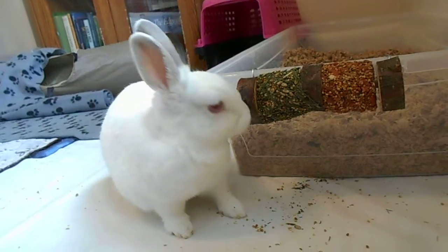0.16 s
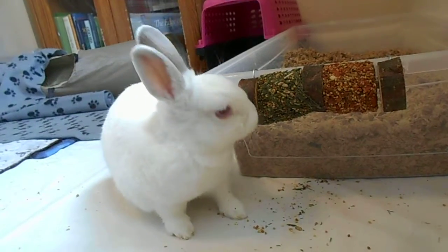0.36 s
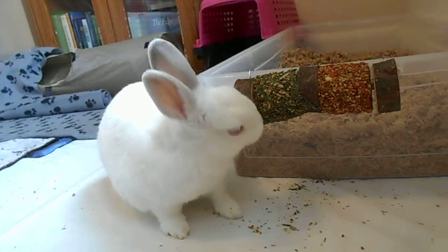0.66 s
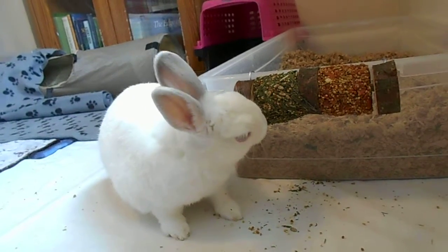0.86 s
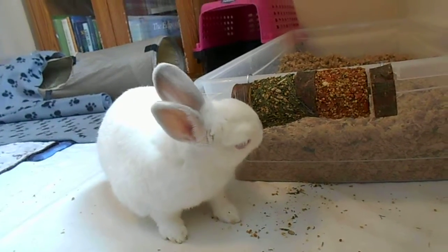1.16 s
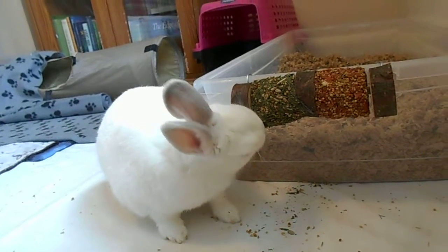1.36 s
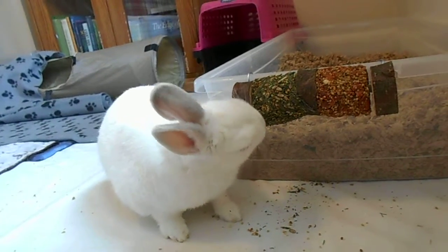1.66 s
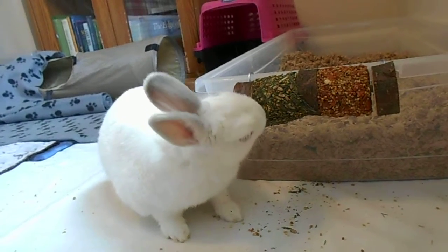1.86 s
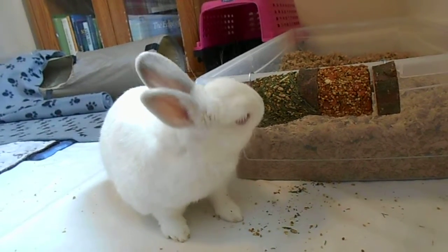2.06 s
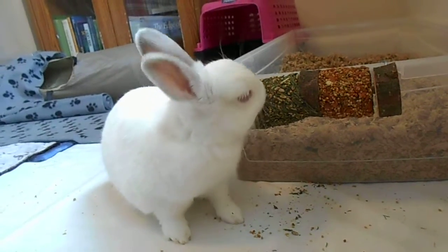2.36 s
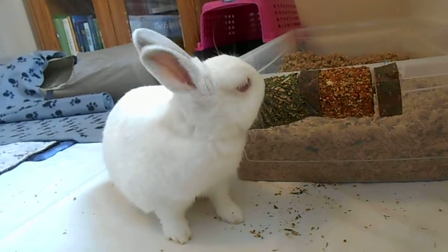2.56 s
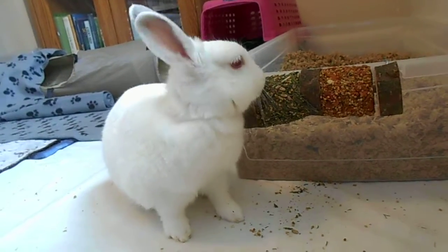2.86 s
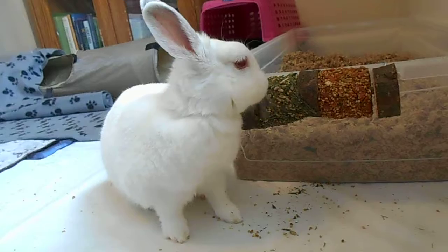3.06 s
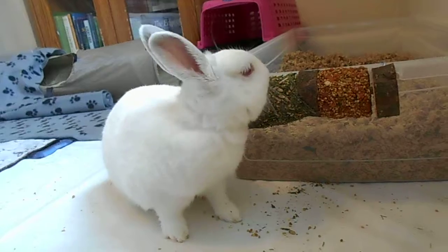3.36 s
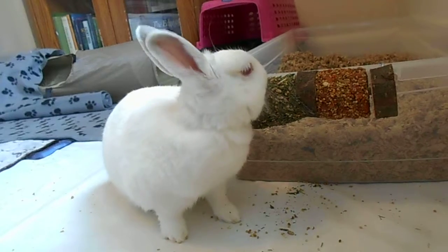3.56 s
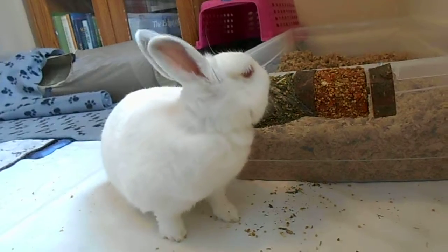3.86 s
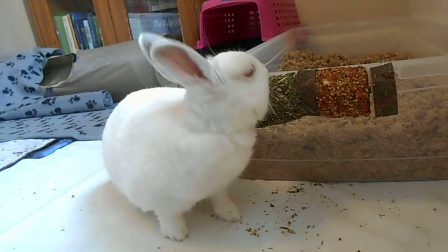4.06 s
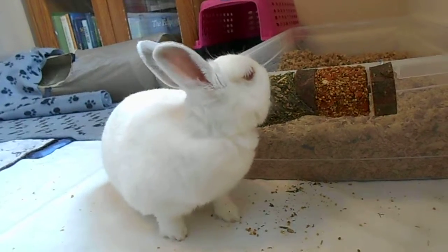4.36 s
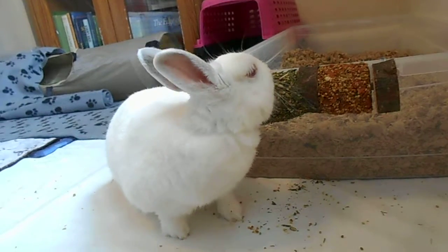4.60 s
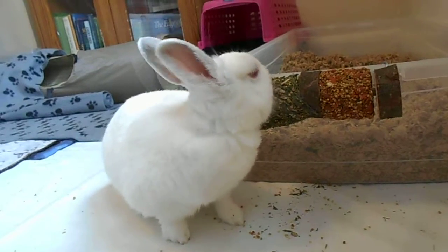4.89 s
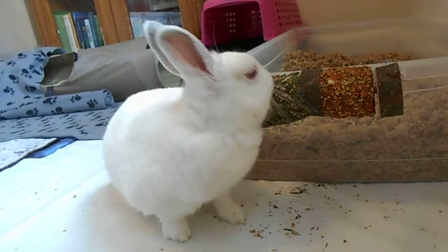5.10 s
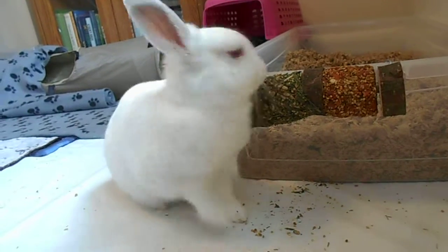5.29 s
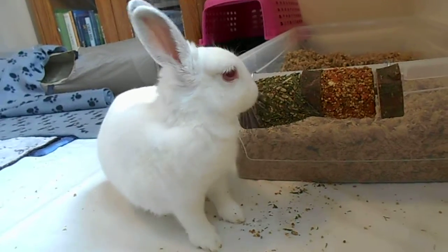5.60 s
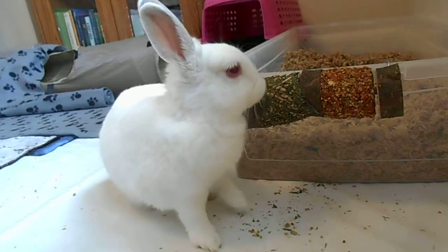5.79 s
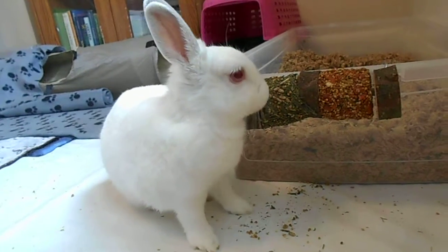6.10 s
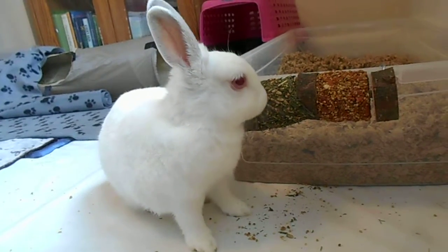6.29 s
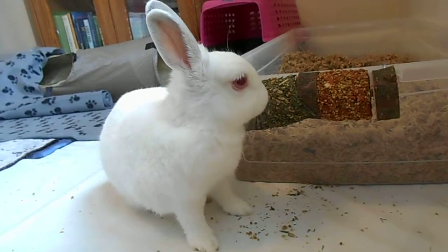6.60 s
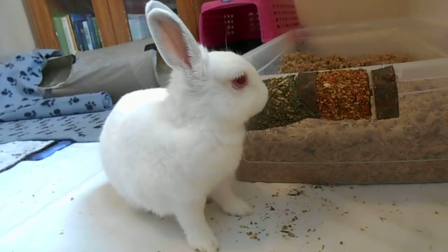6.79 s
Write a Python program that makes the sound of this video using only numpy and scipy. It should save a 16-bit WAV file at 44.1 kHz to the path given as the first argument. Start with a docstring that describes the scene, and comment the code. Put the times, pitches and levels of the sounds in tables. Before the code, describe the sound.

In a quiet room, a rabbit gnaws a hollow seed-crusted chew log in sharp, crunchy bursts, with woody knocks and low plastic-box thumps.

```python
"""First one hears room rumble and microphone hiss, and a far low hum that glides up and fades.
Then, close to a small microphone in a quiet room, a rabbit gnaws a seed-crusted wooden chew log.
In each stroke the teeth scrape, slip and crack crust and fibres: noise bursts through resonances.
Tugs knock the hollow log and the plastic box behind it: damped sines. A tap, ticks and soft thuds join in."""
import sys
import numpy as np
from scipy import signal
from scipy.fft import rfft, irfft, next_fast_len
from scipy.io import wavfile
from scipy.ndimage import uniform_filter1d, map_coordinates

SR = 44100
rng = np.random.default_rng(int(sys.argv[2]) if len(sys.argv) > 2 else 0)


def put_to_file(sound):
    """Save the sound as 16-bit audio at rate SR, in the file named by the first command-line argument."""
    columns = np.atleast_2d(sound).T  # one column per channel
    safe = np.clip(columns, -1, 1)
    whole_steps = np.round(safe * 32767)
    wavfile.write(sys.argv[1], SR, whole_steps.astype(np.int16))


def boost_factor(decibels):
    """Convert a level in decibels to a linear amplitude factor."""
    exponent = np.asarray(decibels, float) / 20
    return 10 ** exponent


N = 306173


def unit(x):
    """Scaled to rms 1."""
    return x / np.sqrt(np.mean(x ** 2) + 1e-20)


def along(points, hz):
    """Value at each frequency from (f/Hz, value) points on a log axis."""
    f, value = np.transpose(points)
    return np.interp(np.log(hz + 1), np.log(f + 1), value)


def curves(rows, outside=None):
    """One value per sample for each column after the time."""
    s, *columns = np.transpose(rows)
    t = np.arange(N) / SR
    return [np.interp(t, s, column, outside, outside) for column in columns]


def wobble(rate):
    """A smooth random curve, rate knots a second."""
    knots = rng.standard_normal(int(N * rate / SR) + 4)
    return map_coordinates(knots, [np.arange(N) * rate / SR])


def filtered(x, response):
    """x times a complex response of frequency."""
    m = next_fast_len(N + SR // 2)
    return irfft(rfft(x, m) * response(np.fft.rfftfreq(m, 1 / SR)), m)[..., :N]


def modes(table):
    """Causal response of a set of resonances, with alternating signs."""
    def response(f):
        total = 0
        for k, (centre, width, db) in enumerate(table):
            damping = 1j * f * width
            total = total + (-1) ** k * boost_factor(db) * damping / (centre * centre - f * f + damping)
        return total
    return response


def grit(spiky_db, rate):
    """Noise of rms 1 broken into lumps."""
    return unit(rng.standard_normal(N) * boost_factor(spiky_db * wobble(rate)))


def swell(u, power):
    """Rises to 1 at u = 1, then dies away."""
    return (u * np.exp(1 - u)) ** power


# spectral shape of the rumble and hiss, relative: f/Hz, level/dB per Hz
HISS_SHAPE = [(12, -38), (20, 6), (38, -7), (65, -1), (85, -7), (138, -4), (167, -9.5), (310, -12.5),
              (345, -13), (503, -16), (884, -19), (8440, -27.5), (10200, -29.5), (12300, -59), (16000, -87),
              (22000, -120)]


def hiss():
    """Room rumble and the microphone's own steady noise."""
    rms_db = -57
    noise = filtered(rng.standard_normal(N), lambda f: boost_factor(along(HISS_SHAPE, f)))
    return boost_factor(rms_db) * unit(noise)


# a far motor-like tone, before its random wavering: t/s, f/Hz, level/dB
HUM_GLIDE = [(.05, 115.8, -68), (.4, 125.7, -56), (.6, 136.7, -57.5), (.72, 139, -52.5),
             (1.14, 142.3, -53.5), (1.2, 148, -72), (1.3, 154.8, -62), (1.4, 154.4, -74)]
# a fuzzy hum near the pitch of the box wall wavers, loudest in the hardest gnawing: t/s, level/dB
BOX_DRONE = [(1.3, -61), (1.68, -71), (2.02, -61.5), (2.5, -79), (2.9, -68.5), (3.22, -84), (3.65, -62),
             (3.98, -53), (4.17, -82), (4.24, -61), (4.45, -49.5), (5.6, -71.5), (5.8, -59.5), (6.05, -78),
             (6.24, -56), (6.45, -85), (6.78, -58.5), (6.9, -75)]


def hum():
    """A wavering low sine that climbs, and the fuzzy hum of the box wall: noise in a narrow resonance."""
    hz, db = curves(HUM_GLIDE)
    on = uniform_filter1d((np.arange(N) < HUM_GLIDE[-1][0] * SR) * 1., 4000)
    level = np.sqrt(2) * on * boost_factor(db + 2.2 * wobble(14.3))
    phase = 2 * np.pi * np.cumsum(hz + 1.5 * wobble(12.9)) / SR
    fuzz = unit(filtered(rng.standard_normal(N), lambda f: modes([(143, 12, 0)])(f) ** 2))
    return level * np.sin(phase) + boost_factor(curves(BOX_DRONE, outside=-120)[0]) * fuzz


# the body shifting its weight on the floor: t/s, level/dB
FLOOR_SHUFFLE = [(2.55, -57.5), (2.7, -60), (3.7, -67), (3.85, -54), (4.9, -55), (5.3, -52), (5.55, -55)]


def shuffle():
    """Soft thuds through the floor, below the log's modes: lumpy noise in a low resonance."""
    thud = unit(filtered(grit(spiky_db=4, rate=14), lambda f: modes([(45, 60, 0)])(f) ** 2))
    return boost_factor(curves(FLOOR_SHUFFLE, outside=-120)[0]) * thud


# how fast the room's answer dies: f/Hz, t60/s
ROOM_DECAY = [(200, 0.18), (2000, 0.17), (10000, 0.1)]


def room(x):
    """The walls answer with a tail of decaying noise, each frequency dying at its own speed."""
    out, step = np.zeros(N + SR), SR // 40  # the tail is a fresh random draw every 25 ms
    delay = 150  # samples
    for start in range(0, N, step):
        hz, t, z = signal.stft(rng.standard_normal(SR // 4), SR, nperseg=256)
        decay = boost_factor(-60 * t / along(ROOM_DECAY, hz)[:, None])
        tail = signal.istft(z * decay, SR, nperseg=256)[1]
        tail *= 1 - np.exp(-np.arange(len(tail)) / SR / 0.00077)  # echoes thicken over the first ms
        wet = signal.fftconvolve(x[start:start + step], tail / np.linalg.norm(tail))
        out[start + delay:][:len(wet)] += wet[:N + SR - start - delay]
    return out[:N]


# the small microphone's response: f/Hz, level/dB
MIC_RESPONSE = [(20, -11.5), (10200, 0.5), (10900, -16.5), (11400, -16.5), (12300, -23), (12600, -67)]


def mic(x):
    """The microphone's colour: a gain at each frequency."""
    return filtered(x, lambda f: boost_factor(along(MIC_RESPONSE, f)))


# one dry tick near the microphone: t/s, level/dB, width/ms
NEAR_TAP = (.7507, -29.5, 0.22)


def tap():
    """A quick push of air and a slower, shallower rebound."""
    s, db, ms = NEAR_TAP
    u = (np.arange(N) / SR - s) / (ms / 1000)
    push = np.exp(-u ** 2 / 2)
    rebound = 0.44 * np.exp(-((u - 5.5) / 4.3) ** 2 / 2)
    return boost_factor(db) * (push - rebound)


# short pitched ticks, perhaps hard seeds snapping or crumbs landing: t/s, level/dB, f/Hz
SEED_PINGS = [(2.653, -32, 1780), (2.66, -36, 2030), (2.673, -38, 1900), (3.788, -40, 1440),
              (4.256, -26, 1490), (5.336, -35, 2340), (5.798, -44, 1640), (5.952, -33.5, 1160),
              (5.965, -37, 990), (6.181, -38.5, 1175)]


def pings():
    """One damped resonance per tick."""
    t60_s, rise_s = .03, .0012
    out, t = np.zeros(N + SR), np.arange(SR // 10) / SR
    for s, db, hz in SEED_PINGS:
        envelope = boost_factor(db - 60 * t / t60_s) * (1 - np.exp(-t / rise_s))
        out[round(s * SR):][:len(t)] += envelope * np.sin(2 * np.pi * hz * t)
    return out[:N]


# strokes of the incisors along the log, with the levels before they sag:
# t/s of the start, length/s, scrape level/dB, shake of the log level/dB, boom of the box level/dB
TOOTH_STROKES = [(2.633, 0.12, -67, -41, -36), (3.484, .11, -64, -46, -38), (3.712, .055, -74, -56.5, -48),
                 (3.775, .15, -53, -34.5, -28.5), (4.124, 0.09, -73, -56, -35),
                 (4.223, 0.083, -55, -30, -26), (4.388, .09, -57.5, -49, -28.5),
                 (4.488, 0.1, -66, -57, -46), (4.61, 0.12, -55, -31.5, -33.5), (4.75, 0.1, -54, -62, -39),
                 (5.027, 0.1, -55.5, -40, -31.5), (5.329, 0.14, -58.5, -58, -42),
                 (5.508, 0.12, -73, -54.5, -56)]
RELEASE_S = 0.048


def strokes(column, sag_db_per_s, release_s):
    """Gain of one stroke column: a quick attack, a steady sag, a release after the teeth let go."""
    attack_s = 0.0081
    table = np.array(TOOTH_STROKES)
    t = np.arange(N) / SR - table[:, :1]
    length, db = table[:, [1]], table[:, [column]]
    on = np.clip(t / attack_s, 0, 1) * np.exp(-np.maximum(t - length, 0) / release_s)
    return np.max(on * boost_factor(db - sag_db_per_s * np.maximum(t, 0)), axis=0)


def scrape():
    """How hard the teeth rub the crust."""
    return strokes(column=2, sag_db_per_s=56, release_s=RELEASE_S)


def shake():
    """How hard the log is shaken; it stops sooner than the rubbing."""
    return strokes(column=3, sag_db_per_s=42, release_s=0.0051)


MOST_SLIPS = 24  # room for the slips of one stroke


def slips(gain, over_db, scatter_db):
    """Unevenly spaced slips inside every stroke: times, levels, two chance values and lengths in ms."""
    rate, typical_ms = 125, 2.2  # slips per s
    table = np.array(TOOTH_STROKES)
    chance = rng.standard_normal((len(table), MOST_SLIPS, 4))
    start, length = table[:, :1], table[:, 1:2]
    since = (np.arange(MOST_SLIPS) + rng.random((len(table), MOST_SLIPS))) / rate
    inside = since < length
    s, chance = (start + since)[inside], chance[inside]
    gain_db = 20 * np.log10(gain[np.round(s * SR).astype(int)] + 1e-9)
    db = gain_db + over_db + scatter_db * chance[:, 0]
    return s, db, chance[:, 1], chance[:, 2], typical_ms * np.exp(.35 * chance[:, 3])


# resonances of the hollow log: f/Hz, width/Hz, level/dB
LOG_MODES = [(201.5, 95, -4.5), (321, 177, -3), (423, 34.6, -0.5), (437.3, 58.4, 8), (602, 210, -7),
             (712, 91, -4), (800, 129, -6)]
# resonances of teeth and crust, four groups from low to high: f/Hz, width/Hz, level/dB
CRUST_MODES = [
    [(1020, 190, 9), (1585, 204, 10)],
    [(2053, 133, 11.5), (2714, 266, 10), (3450, 660, 6)],
    [(4870, 1630, 9), (6020, 1140, 9.5)],
    [(7760, 1650, 2.5), (9400, 1200, 8.5), (9900, 2160, 4), (11900, 930, -1)],
]


def grind():
    """Dense small slips of the teeth hiss in the crust and shake the log: lumpy noise in their modes."""
    crust = unit(filtered(grit(spiky_db=4, rate=800), modes(sum(CRUST_MODES, []))))
    body = unit(filtered(grit(spiky_db=5, rate=90), lambda f: modes(LOG_MODES)(f) * f / (f + 300)))
    return scrape() * crust + shake() * body


# the strong jolts of teeth on the log, before its resonances:
# t/s of the peak, level/dB, hardness/dB per half octave, length/ms
JOLTS = [(0.0528, -46.5, -8, 2.2), (1.9957, -48.5, 2, 3.4), (2.2796, -49, -3, 3.6), (2.5927, -49, -8, 6.8),
         (2.6395, -32, 2.5, 2.6), (2.6538, -32, -3, 3.1), (2.6676, -30, 4, 3.7), (2.674, -28, -1, 6.1),
         (2.6853, -34.5, 3.5, 2.9), (2.694, -32, -8.5, 1.8), (2.7242, -46, -12, 3.5),
         (2.7538, -32.5, -5, 8.5), (2.781, -44, -4, 3), (3.4925, -46, -10.5, 7.9),
         (3.5289, -39.5, -8.5, 3.8), (3.5486, -37.5, -7, 4.8), (3.578, -37, -3, 2.9),
         (3.781, -33.5, 3, 3.1), (3.7881, -22.5, -2.5, 4.9), (3.797, -33, 3.5, 3.8),
         (3.8118, -26.5, -5.5, 6.9), (3.8195, -31.5, -6, 4.9), (3.8328, -26, -2, 4.2),
         (3.8438, -12, -3, 13.3), (3.8647, -31, 4, 8.6), (3.9188, -34.5, -6.5, 4),
         (4.1291, -52, -15.5, 10.8), (4.18, -38, -5, 2.6), (4.242, -24, 3.0, 13.5),
         (4.2516, -22.5, -6, 3.5), (4.2604, -20, -2, 3.78), (4.2736, -35, 5, 3.8), (4.2922, -18, -4, 8.4),
         (4.3178, -24, 3.5, 4.6), (4.35, -46, -11, 8), (4.4065, -17.5, -2.5, 5.16), (4.4129, -34, 9, 2.9),
         (4.5835, -41, -9, 12.5), (4.6164, -33.5, -11.5, 5.8), (4.6249, -23.5, -6, 11.5),
         (4.642, -18.5, 2.5, 4.4), (4.6499, -10, -1, 7.46), (4.666, -37, 3, 6.3), (4.682, -33, 5, 5.5),
         (4.698, -22.5, -6, 5.3), (4.724, -20.5, -1, 6.8), (4.7332, -39.5, -8.5, 2.1),
         (4.763, -17, -4.5, 7.4), (4.7731, -37, 8.5, 3.8), (4.801, -35, 8.5, 7), (4.811, -37, -9, 3.6),
         (5.0406, -29, -6.5, 2.64), (5.0628, -26, -3, 5.7), (5.0799, -31, -2, 3.6), (5.0859, -33, -4, 3.9),
         (5.135, -32.5, -7.5, 4.7), (5.263, -44.5, -1, 7.6), (5.341, -25.5, 1.5, 5.35),
         (5.358, -35.5, 9.5, 2.2), (5.4326, -38.5, 4.5, 2.45), (5.4555, -46, -13.5, 12.6),
         (5.504, -49.5, -9, 2.9), (5.639, -51.5, -8.5, 4.6), (5.6962, -51, -10, 3.6),
         (5.7268, -47, 6.5, 3.8), (5.9475, -42, 4, 4), (6.656, -49.5, 6, 3.7)]
# the plastic wall of the box: f/Hz, width/Hz
BOX_WALL = (149.7, 19)


def knocks():
    """A jolt rings the log until the jaw's grip damps it; harder contacts favour the upper modes; the box booms on."""
    (out, box), t = np.zeros((2, N + SR)), np.arange(SR // 5) / SR
    hz, width, mode_db = np.transpose(LOG_MODES)[:, :, None]
    sign = (-1.) ** np.arange(len(LOG_MODES))[:, None]
    rings = sign * np.sin(2 * np.pi * hz * t) * np.exp(-np.pi * width * t)
    box_hz, box_width = BOX_WALL
    boom = np.sin(2 * np.pi * box_hz * t) * np.exp(-np.pi * box_width * t) * (1 - np.exp(-t / 0.0047))
    against_box = strokes(column=4, sag_db_per_s=43, release_s=RELEASE_S)
    most = len(JOLTS) + MOST_SLIPS * len(TOOTH_STROKES)
    chances = rng.standard_normal((most, len(LOG_MODES) + 1, 1))
    s, db, a, _, ms = slips(shake(), over_db=-2.5, scatter_db=2.5)
    small_jolts = list(zip(s, db, -2 + 2.5 * a, 1.44 * ms))
    for k, ((s, db, hard_db, ms), chance) in enumerate(zip(JOLTS + small_jolts, chances)):
        rise = 0.5 * ms / 1000
        tilt_db = hard_db * 2 * np.log2(hz / 450)
        ring = np.sum(boost_factor(mode_db + tilt_db + 1.5 * chance[1:]) * rings, axis=0)
        grip = swell(t / rise, 2.4) + boost_factor(-13.5) * (1 - np.exp(-t / rise))
        start = round((s - rise) * SR)
        out[start:][:len(t)] += boost_factor(db) * ring * grip
        if k < len(JOLTS):  # only the strong jolts reach the box
            box[start:][:len(t)] += against_box[round(s * SR)] * boost_factor(3.4 * chance[0]) * boom

    def radiation(f):
        # the small log radiates little below its first modes or above its last
        return (1j * f / (230 + 1j * f)) ** 2 / (1 - (f / 950) ** 2 + 1.1j * f / 950)
    return filtered(out[:N], radiation) + box[:N]


# the loud breaks of fibres and seeds, and the lone ticks, before the crust resonances:
# t/s of the peak, level/dB at 4-7 kHz, 2-4 kHz part/dB and 7-11 kHz part/dB over that, length/ms
BREAKS = [(0.0608, -62.5, 13, 7, 3.9), (1.5242, -55, 8, -5, 2.6), (1.54, -56.5, 12.5, -12, 3.3),
          (1.5576, -49, 1, -4, 1.8), (1.992, -55, 5, -7, 2.1), (2.1732, -48.5, -3, -6, 2.1),
          (2.2548, -53, -1, -8, 1.8), (2.278, -60, 12, 6, 2.34), (2.637, -61, 13.5, -9, 2.6),
          (2.6555, -46, 3, -3, 6.4), (2.674, -58, 19, -5, 1.4), (2.684, -58, 6, -7, 2.2),
          (2.7488, -53.5, 7, 1, 3.5), (3.4972, -48, 2, -15, 1.7), (3.5783, -51.5, -11, 3.5, 2.5),
          (3.7773, -29.5, -4, 1, 2.5), (3.7848, -34.5, 1.5, -3, 6.5), (3.799, -42, -6, 11, 1.9),
          (3.807, -41.5, 4, -4, 4.3), (3.8174, -44, 1, -11, 4.6), (3.8381, -30, 5, 6, 3),
          (3.847, -39, -13, -16, 1.4), (3.86, -42, -15, -7, 2.2), (3.8645, -35, -13, -12, 1.6),
          (3.876, -33.5, -13, 1.5, 1.6), (3.8865, -43.5, -1, -4, 7.1), (3.8972, -40, -24, -13, 1.3),
          (3.9077, -42, -17, 4, 1.5), (4.2284, -38.5, 4, 2, 2.1), (4.2342, -35.5, 2, 3.5, 1.9),
          (4.239, -26.5, -1.5, -1.5, 4.3), (4.2543, -30.5, 1, 3, 3.5), (4.271, -37, 3, -10, 2.9),
          (4.2878, -37, -10, -11, 3.1), (4.3149, -37, 13, -1, 1.16), (4.3938, -29.5, 0, 7.5, 2.04),
          (4.4029, -25.5, -1.5, -7, 3.04), (4.436, -50, -13, -10, 2.9), (4.4875, -50, -15, -16, 1.7),
          (4.5794, -49, 1, 1, 4.5), (4.613, -35, 2, 7, 0.74), (4.6186, -41, 3.5, 2, 3.5),
          (4.6375, -23, 5.5, 1, 4.2), (4.6455, -35.5, 4.5, 8, 4), (4.6878, -30, -13, 2, 1.2),
          (4.6939, -36, 8, 7.5, 4.2), (4.719, -38, 4, -9, 2.8), (4.749, -37, 2, 0, 1.2),
          (4.758, -20, -4.5, -2.5, 2.6), (4.7735, -45, -8, -1, 1.3), (4.7976, -36, 1.5, 7.5, 3.8),
          (4.8066, -30, -4, -7, 1.7), (5.0362, -40, -3, -23, 2.47), (5.057, -33, 1, -8, 2.2),
          (5.074, -35.5, 1.5, -8, 3), (5.0823, -26, -0.5, -2, 0.96), (5.0915, -37, -9, 3, 2.5),
          (5.0995, -40, -4, -16, 2.5), (5.131, -56, -3, -10.5, 3.9), (5.238, -51.5, -4, 5, 2),
          (5.3373, -25.5, 2.5, -5.5, 1.8), (5.3773, -50, -6, 3, 2.1), (5.4544, -49, -12, -4, 6.9),
          (5.636, -47.5, 2, -4, 2.5), (5.696, -49.5, 6, -2, 3.5), (5.721, -46, 2, 5.5, 3.4),
          (5.7258, -45.5, -2, -15, 2.3), (5.743, -53, 9, -8, 2.8), (5.797, -56, 4, -15, 3.7),
          (5.9458, -48, 10.5, -11, 1.37), (5.954, -49, 1, -7, 2.6), (6.06, -47.5, -11, -2, 1.6),
          (6.183, -54, 2.5, -6, 3.0), (6.6527, -56.5, 8.5, -13, 2.2)]
# the higher groups of crust resonances come and go faster: speed ratio [-]
GROUP_SPEED = np.array([[.9], [1.05], [1.2], [1.5]])


def cracks():
    """Each break is a burst of a few ms that drives the four groups of crust resonances by its own shares."""
    drive, t = np.zeros((4, N + 800)), np.arange(800) / SR
    noises = rng.standard_normal((len(BREAKS) + MOST_SLIPS * len(TOOTH_STROKES), 4, 800))
    s, db, a, b, ms = slips(scrape(), over_db=5, scatter_db=4)
    small_breaks = list(zip(s, db, -1.5 + 5 * a, -7 + 5 * b, ms))
    for (s, db, mid_db, top_db, ms), noise in zip(BREAKS + small_breaks, noises):
        rise = 0.86 * ms / 1000
        shape = swell(np.maximum((t - rise) * GROUP_SPEED + rise, 0) / rise, 2.72)
        burst = shape * noise
        # the size of a break is set by its row, not by the noise
        burst *= (np.linalg.norm(shape, axis=1) / np.linalg.norm(burst, axis=1))[:, None]
        low_db = mid_db - 2 - 0.36 * (db + 40)  # 0.9-2 kHz part: weaker breaks are duller
        shares = boost_factor(db + np.array([low_db, mid_db, 0, top_db]))[:, None]
        drive[:, round((s - rise) * SR):][:, :800] += shares * burst

    def narrow(group):
        centre = np.mean(group, axis=0)[0]
        return lambda f: modes(group)(f) * modes([(centre, .9 * centre, 0)])(f)
    return sum(filtered(d[:N], narrow(group)) for d, group in zip(drive, CRUST_MODES))


def scene():
    """Gnawing, its room, and the background."""
    bright, dull = mic(cracks() + pings()), knocks()
    gnawing = bright + dull + mic(grind()) + tap()
    walls = room(boost_factor(-11) * bright + boost_factor(-10.0) * dull)
    return (gnawing + walls + shuffle() + hum() + hiss())[None]


def roll_off(x):
    """The treble ends steeply here."""
    return signal.sosfilt(signal.butter(12, 12450, fs=SR, output="sos"), x)


def record(dry):
    """Takes down the finished mix."""
    return roll_off(dry)


dry = scene()
out = record(dry)
put_to_file(out)
```